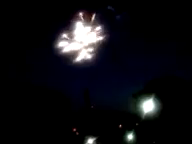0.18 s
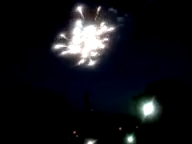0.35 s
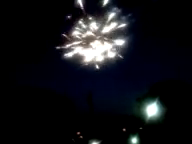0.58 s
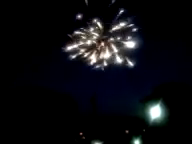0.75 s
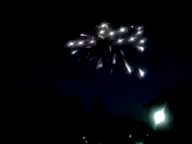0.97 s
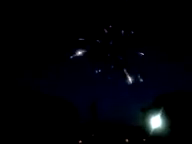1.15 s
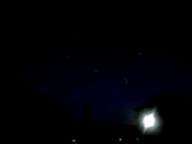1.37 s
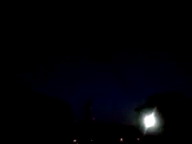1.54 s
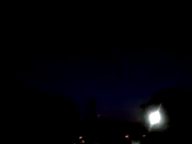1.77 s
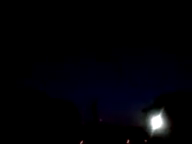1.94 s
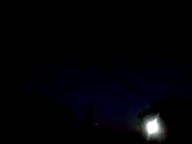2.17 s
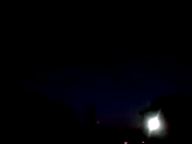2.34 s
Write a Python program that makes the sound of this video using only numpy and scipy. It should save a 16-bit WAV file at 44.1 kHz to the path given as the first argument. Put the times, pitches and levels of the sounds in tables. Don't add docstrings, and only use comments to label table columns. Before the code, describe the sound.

Faint distant knocks and a dying rocket whistle, then a sudden burst of firework booms and harsh crackles, thinning to one sharp pop and soft far thuds in open air, boxy and clipped.

```python
import sys
import numpy as np
from scipy import signal
from scipy.fft import rfft, irfft, next_fast_len
from scipy.io import wavfile
from scipy.ndimage import uniform_filter1d, map_coordinates

SR = 44100
rng = np.random.default_rng(int(sys.argv[2]) if len(sys.argv) > 2 else 0)


def invert_db(x):
    u = np.asarray(x, float) / 20
    return 10 ** u


def int16_out(signal):
    q = np.round(np.clip(np.atleast_2d(signal).T, -1, 1) * 32767)
    wavfile.write(sys.argv[1], SR, q.astype(np.int16))


N = 110250


def unit(x):
    return x / np.sqrt(np.mean(x ** 2) + 1e-20)


def seconds():
    return np.arange(N) / SR


def curves(rows):
    s, *columns = np.transpose(rows)
    return [np.interp(seconds(), s, column) for column in columns]


def wobble(rate):
    knots = rng.standard_normal(int(N * rate / SR) + 4)
    return map_coordinates(knots, [np.arange(N) * rate / SR])


def coloured(x, gain_db):
    size = 2 * next_fast_len(N // 2 + 4096)
    log_gain = np.maximum(gain_db(np.fft.rfftfreq(size, 1 / SR)), -100) * np.log(10) / 20
    cepstrum = irfft(log_gain, size)
    cepstrum[1:size // 2] *= 2
    cepstrum[size // 2 + 1:] = 0
    return irfft(rfft(x, size) * np.exp(rfft(cepstrum)), size)[..., :N]


def on_log(points):
    f, db = np.transpose(points)
    flat_hz = 3400
    return lambda hz: np.interp(np.log(np.minimum(hz, flat_hz) + 1), np.log(f + 1), db)


def bangs(per_s, spread_db, blur, colour, even):
    steady_s = 0.0075
    hit = rng.random(N) < per_s / SR
    size = invert_db(spread_db * rng.exponential(1, N)) * np.sign(rng.standard_normal(N))
    echoes = blur * rng.standard_normal(N)
    x = unit(coloured(unit(hit * size) + echoes, on_log(colour)))
    power = np.abs(uniform_filter1d(x ** 2, round(steady_s * SR)) + 1e-3)
    return unit(x / power ** (even / 2))


def swell(start, length, attack, t60):
    t = seconds() - start
    rise = np.clip(t / max(attack, 1e-4), 0, 1)
    return rise * invert_db(-60 * np.clip(t - length, 0, None) / t60)


def shell():
    # start in seconds, length in seconds, thud level in dB,
    # crackle level in dB.
    volleys = [(.2138, 0.025, -3.5, -8.5), (.25, 0.015, -51, -7.5), (.298, 0.043, -7, -18),
               (.355, 0.039, -17.5, -13.5), (.405, 0.034, -9.5, -10.5), (.44, 0.032, -9.5, -27.5),
               (.488, 0.0077, -12, -23), (.525, 0.036, -6.5, -5.5), (.575, .02, -11.5, -41),
               (.63, 0.025, -9, -24), (.67, 0.075, -25, -12), (.7, .014, -15, -37),
               (.775, 0.018, -15.5, -11), (.825, 0.028, -24, -29), (.855, 0.026, -15.5, -18.5),
               (.905, 0.01, -18.5, -4.5), (.96, .045, -16, -5), (1.035, 0.06, -16, -4.5),
               (1.095, 0.058, -17, -4), (1.185, 0.048, -15, -6.5), (1.235, 0.047, -48, -0.5),
               (1.295, 0.011, -24, -2), (1.353, 0.054, -12, -3), (1.483, .075, -13.5, -4),
               (1.575, 0.0082, -9, 0), (1.615, 0.0064, -24, -11.5), (1.695, 0.014, -19, -37)]
    # time in seconds,
    # thud level in dB, crackle level in dB.
    roll = [(.2, -77, -36), (.22, -12.5, -24), (.5, -14.5, -16.5), (.7, -12.5, -12), (.745, -12.5, -14.5),
            (.85, -20.5, -6), (.95, -23, -9.5), (1.3, -16.5, -3.5), (1.43, -28, -8), (1.48, -32, -8.5),
            (1.62, -44, -10), (1.72, -31.5, -16), (1.85, -35.5, -22), (2.05, -36.5, -27.5),
            (2.3, -49, -37.5), (2.5, -40.5, -27.5)]
    # frequency in Hz, level in dB per Hz.
    thud_colour = [(35, -97), (60, -31.5), (336, -9.5), (486, -4.5), (549, -1.5), (1170, 0), (1600, -12),
                   (2530, -16.5), (4000, -15.5), (5200, -42.5), (8800, -120)]
    # frequency in Hz, level in dB per Hz.
    crack_colour = [(35, -83.5), (60, 0.5), (389, -12.5), (550, -28.5), (613, -2), (790, 1), (2270, 5),
                    (3500, 4), (4600, -70), (5980, -35), (10100, -120)]
    first_attack_s, attack_s, release_t60 = .001, 0.01, 0.07

    thud, crack = invert_db(curves(roll)) ** 2
    for k, (s, length, thud_db, crack_db) in enumerate(volleys):
        attack = attack_s if k else first_attack_s
        shape = swell(s, length, attack, release_t60) ** 2
        thud = thud + shape * invert_db(2 * thud_db)
        crack = crack + shape * invert_db(2 * crack_db)

    flicker_db = .4 * wobble(90)
    low = bangs(1500, spread_db=2.5, blur=.9, colour=thud_colour, even=.8)
    low = low * np.sqrt(thud) * invert_db(flicker_db)
    high = bangs(2500, spread_db=3.5, blur=1.0, colour=crack_colour, even=1.0)
    high = high * np.sqrt(crack) * invert_db(flicker_db + 0.74 * wobble(120))
    return low + high


def blast():
    start_hz, sag_hz_per_s, t60, edge_s = 3100, 2.3e6, .005, .0004
    t = np.arange(70) / SR
    rise = np.clip(t / edge_s, 0, 1)
    fall = np.clip((t[-1] - t) / edge_s, 0, 1)
    wave = -np.sin(2 * np.pi * (start_hz - sag_hz_per_s * t / 2) * t)
    return wave * invert_db(-60 * t / t60) * rise * fall


def blasts(rows):
    s, db = np.transpose(rows)
    spikes = np.bincount(np.round(s * SR).astype(int), invert_db(db), N)
    return signal.fftconvolve(spikes, blast())[:N]


def stars():
    # time in seconds, peak level in dB.
    near_stars = [(.357, 1), (.367, 0), (.399, 0), (.497, 1), (.52, 0), (.584, 0), (.6085, -1), (.621, -1),
                  (.6292, 1), (.6431, 0), (.6693, 0), (.6844, 1), (.7056, 0), (.718, -1), (.7838, 0),
                  (.7975, 0), (.8078, 0), (.8368, 0), (.8463, 0), (.8616, 1), (.9062, 0), (.931, 0),
                  (.9373, 0), (.9553, 0), (.9694, 3), (1.0233, 1), (1.53, 1), (1.6175, 2)]
    return invert_db(-0.5) * blasts(near_stars)


def thumps():
    # start in seconds, peak level in dB, pitch in Hz.
    charges = [
        (0.221, -5, 387),
        (0.321, -5.5, 388),
        (.335, -3, 594),
        (0.416, -2.5, 428),
        (.43, -8, 616),
        (0.453, -10.5, 308),
        (0.547, -3, 418),
        (0.713, -12, 444),
        (1.528, -19, 148),
        (1.587, -27, 150),
    ]
    rise_s, t60 = 0.002, 0.065
    t = seconds()
    return sum(invert_db(db) * swell(s, 0, rise_s, t60) * np.sin(2 * np.pi * hz * (t - s))
               for s, db, hz in charges)


def scattered(x):
    echo_db, echo_t60 = -6, .2
    t = np.arange(SR // 4) / SR
    tail = rng.standard_normal(len(t)) * invert_db(-60 * t / echo_t60)
    return x + invert_db(echo_db) * signal.fftconvolve(x, tail / np.linalg.norm(tail))[:N]


def pop():
    # time in seconds, peak level in dB.
    arrivals = [
        (1.8534, -1),
        (1.858, -8),
        (1.8593, -4),
        (1.8698, -6),
        (1.8714, -7),
        (1.8743, -11),
    ]
    return invert_db(3.5) * scattered(blasts(arrivals))


def far_shells():
    # start in seconds, length in seconds, level in dB.
    breaks = [(.008, 0.0027, -25.5), (.02, 0.0072, -37.5), (0.048, .012, -43), (0.063, .004, -34),
              (0.071, .006, -28.5), (0.098, 0.0056, -24.5), (1.964, 0.045, -37.5), (2.063, 0.032, -34),
              (2.212, 0.033, -39), (2.28, 0.022, -44), (2.399, 0.022, -37), (2.483, .02, -37.5)]
    # frequency in Hz, level in dB per Hz.
    far_colour = [(35, -22), (60, -52), (319, 10), (461, 5.5), (998, -5), (1320, -38.5), (2450, -16),
                  (4000, -36), (5200, -44.5), (8800, -120)]
    knocks = sum(invert_db(db + 2) * swell(s, length, .002, .08) for s, length, db in breaks)
    return knocks * bangs(600, spread_db=2.5, blur=.6, colour=far_colour, even=.9)


def whistles():
    # pitch in Hz, level in dB, time to fade by 60 dB in seconds.
    tones = [
        (2425, -34, .6),
        (1015, -34, 1.2),
    ]
    sputter_per_s, sputter_depth_db = 26, 5
    t = seconds()
    sputter_db = sputter_depth_db * np.cos(2 * np.pi * sputter_per_s * (t - .008))
    total = np.zeros(N)
    for hz, db, t60 in tones:
        level_db = db + 3 + sputter_db * (hz > 2000) + 1.5 * wobble(70) - 60 * t / t60
        total += invert_db(level_db) * np.sin(2 * np.pi * hz * t + .9 * wobble(110))
    return total


def rumble():
    # time in seconds, level in dB.
    rumble_level = [
        (0, -26.5),
        (.1, -33),
        (.2, -29.5),
        (1.9, -36),
        (2.3, -36),
        (2.5, -38),
    ]
    # frequency in Hz, level in dB per Hz.
    night_colour = [(35, -47.5), (60, 7.5), (166, -1.5), (348, 14), (794, 10), (1250, 4.5), (3180, -9.5),
                    (4000, -59.5), (5200, -69), (8800, -120)]
    level = invert_db(curves(rumble_level)[0])
    return level * bangs(400, spread_db=3, blur=1.2, colour=night_colour, even=.5)


def scene():
    near = shell() + stars() + thumps() + pop()
    return (near + far_shells() + whistles() + rumble())[None]


def band_limit(x):
    return signal.sosfilt(signal.butter(12, 16330, fs=SR, output="sos"), x)


def record(dry):
    # frequency in Hz, gain in dB.
    channel_edge = [(3400, 2), (3700, -8), (4000, -15), (4450, -33.5), (4800, -87), (5200, -120)]
    ceiling, top_hz = 0.74, 16200
    hz = np.fft.rfftfreq(2 * N, 1 / SR)
    x = coloured(dry, lambda f: -11 * np.log2(np.maximum(140 / (f + 1), 1)))
    x = irfft(rfft(x, 2 * N) * invert_db(np.interp(hz, *np.transpose(channel_edge))))[..., :N]
    clipped = np.clip(x, -ceiling, ceiling)
    x = irfft(rfft(clipped, 2 * N) * np.clip((top_hz - hz) / 400, 0, 1))[..., :N]
    return band_limit(x)


dry = scene()
out = record(dry)
int16_out(out)
```